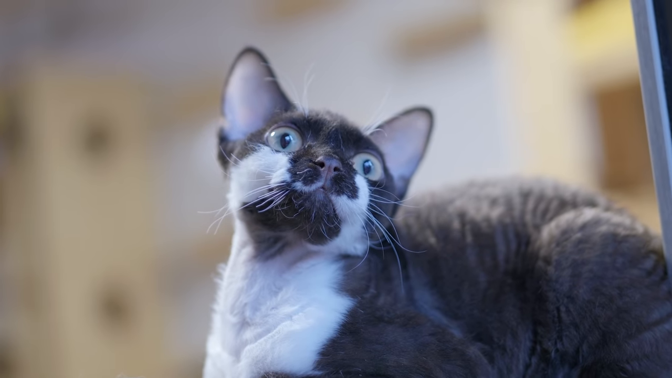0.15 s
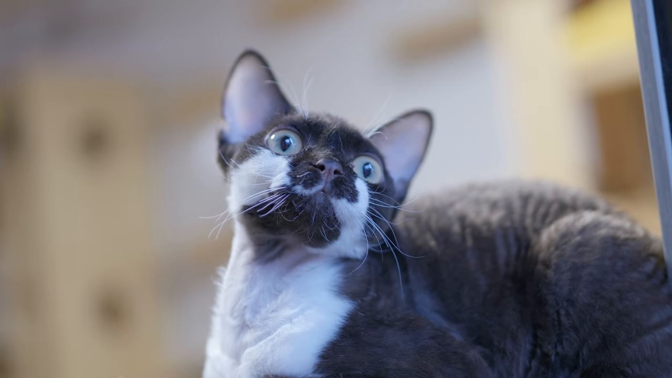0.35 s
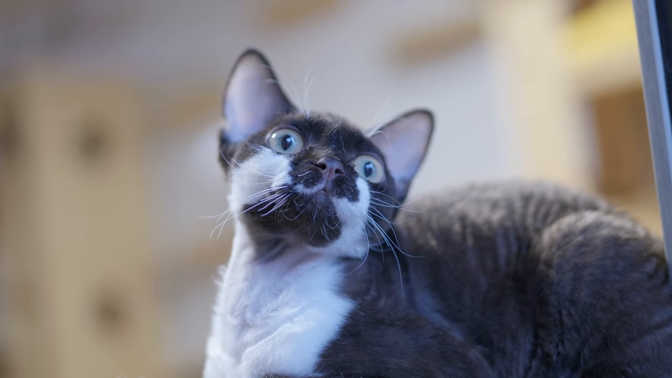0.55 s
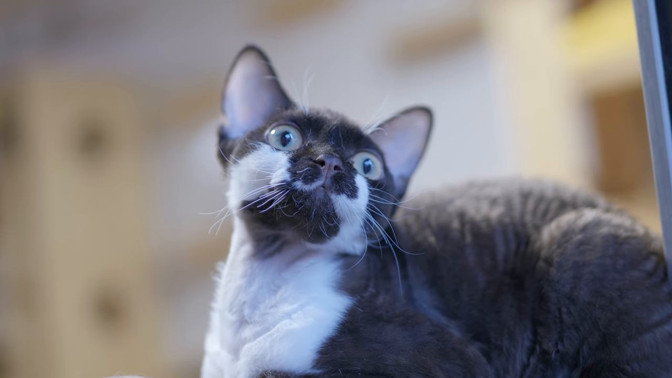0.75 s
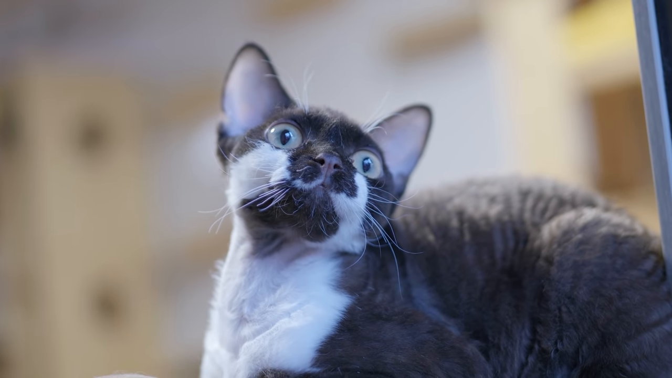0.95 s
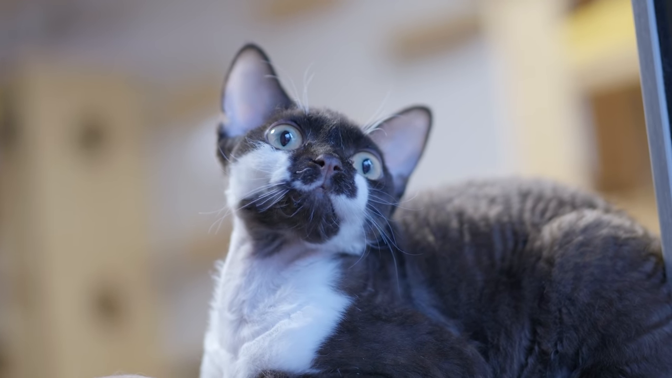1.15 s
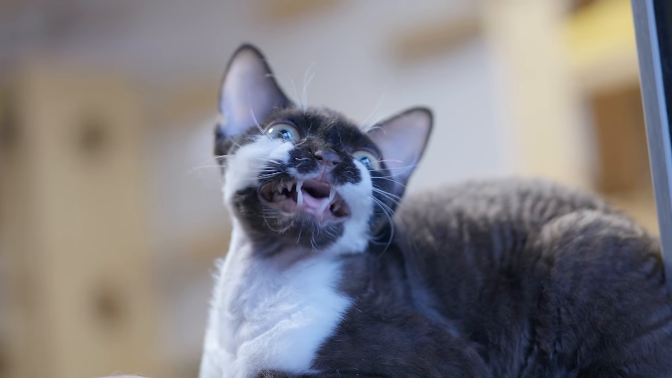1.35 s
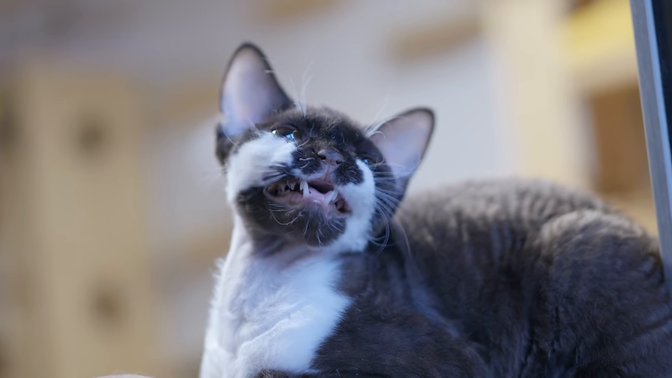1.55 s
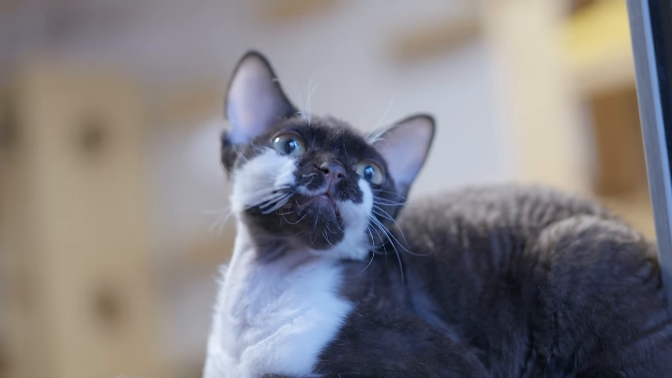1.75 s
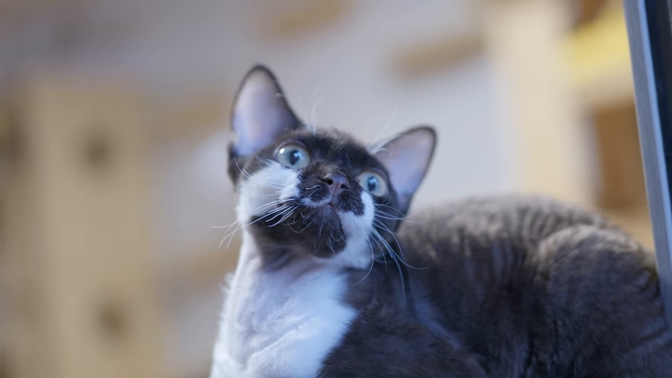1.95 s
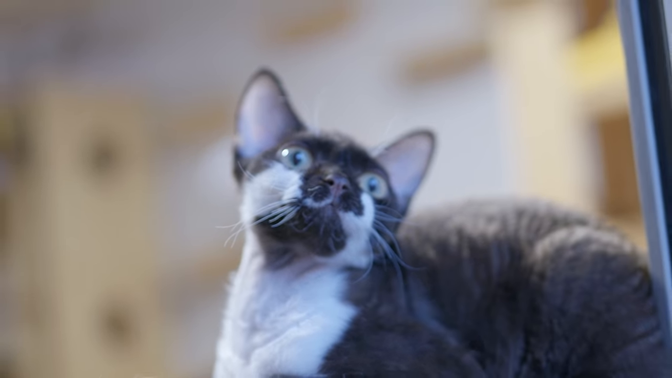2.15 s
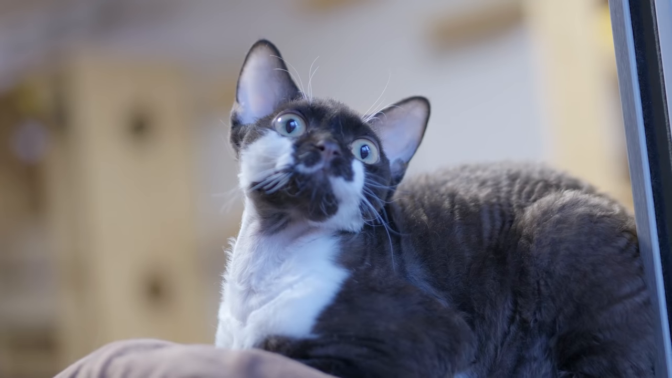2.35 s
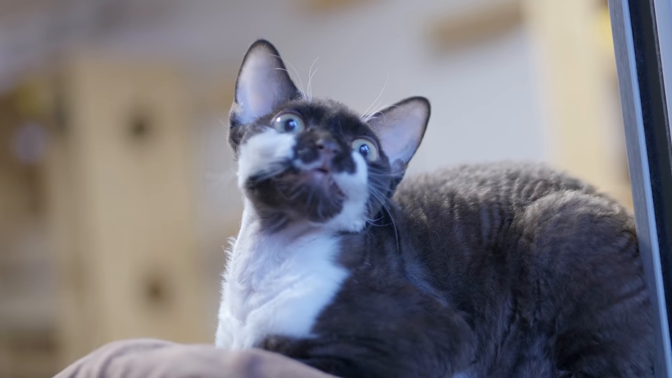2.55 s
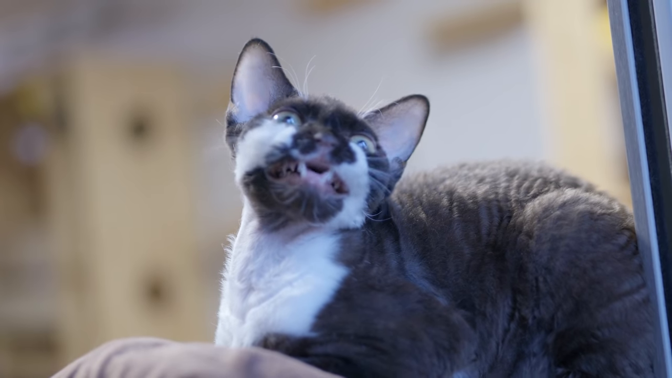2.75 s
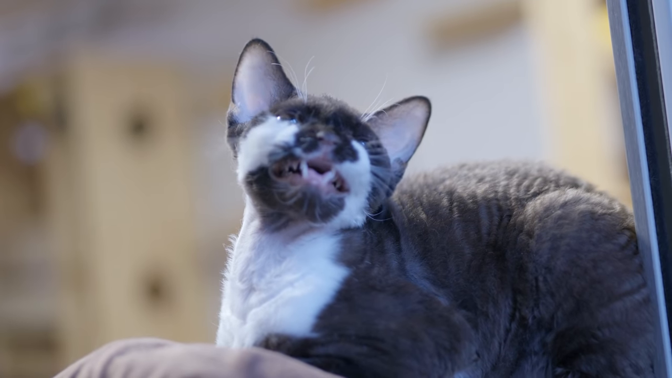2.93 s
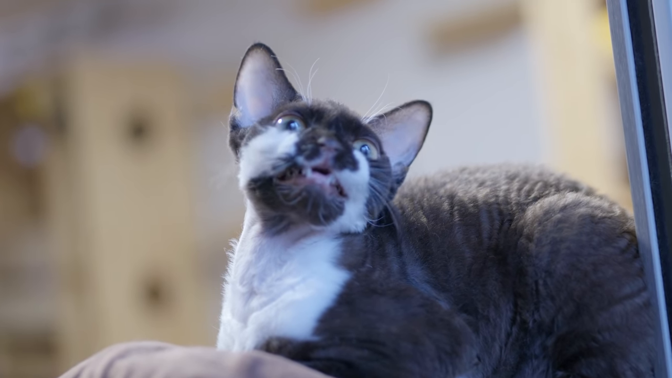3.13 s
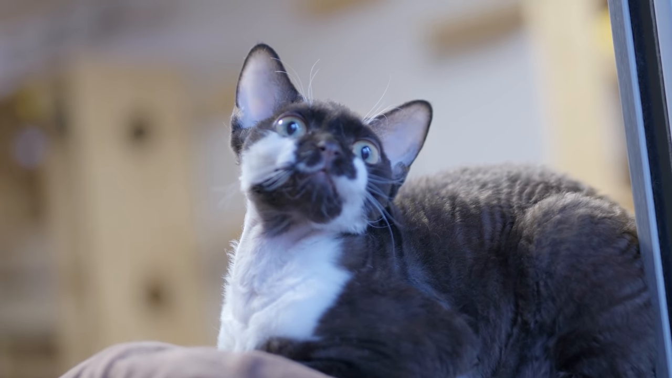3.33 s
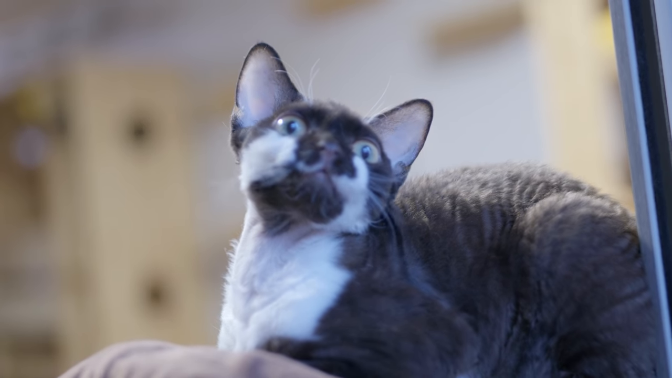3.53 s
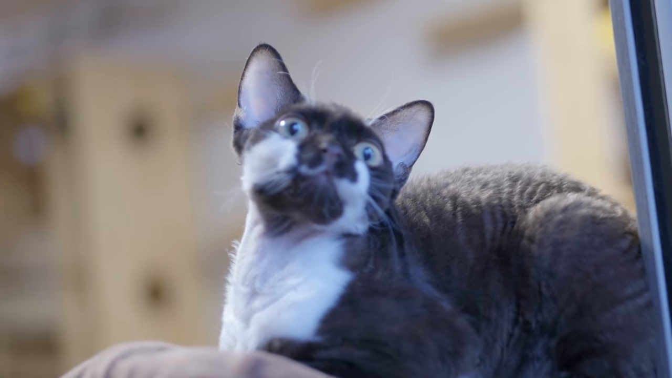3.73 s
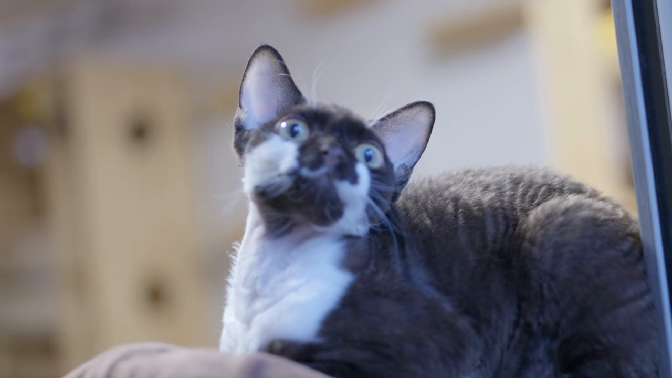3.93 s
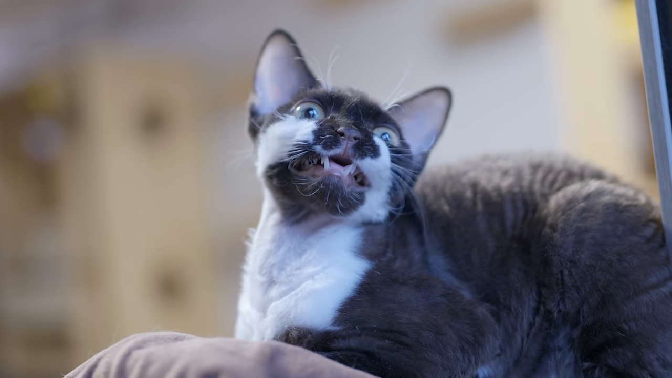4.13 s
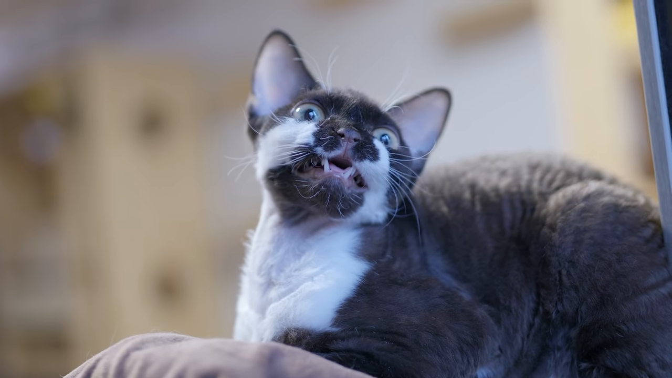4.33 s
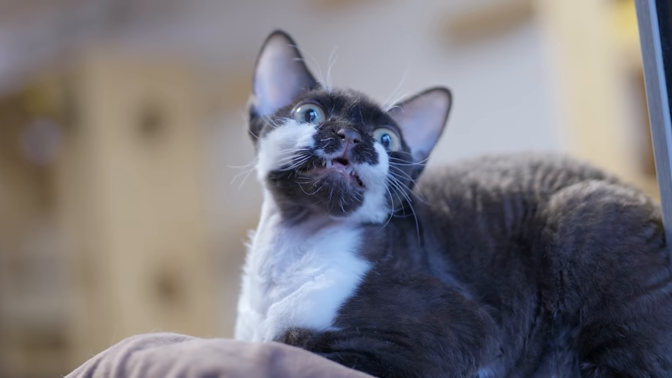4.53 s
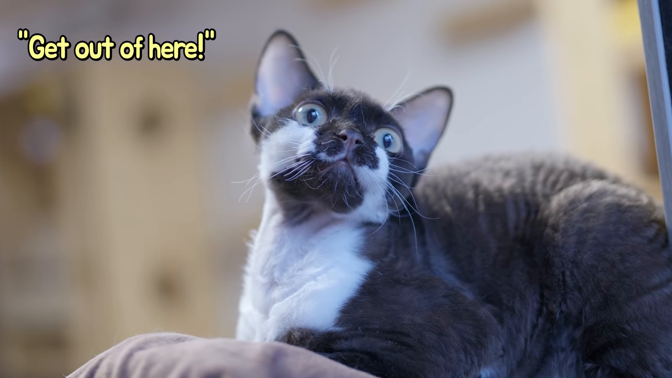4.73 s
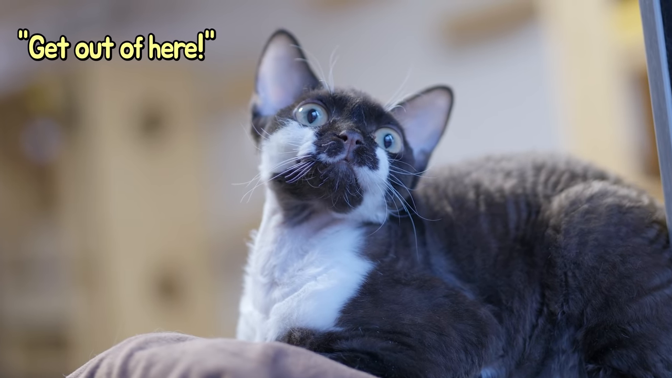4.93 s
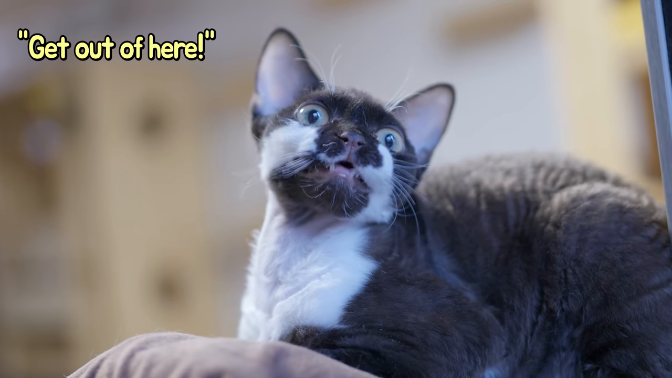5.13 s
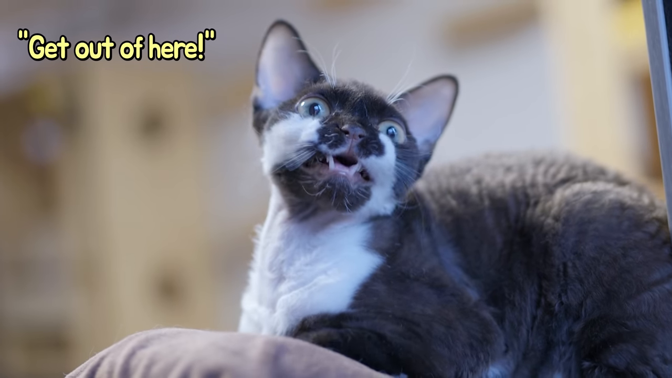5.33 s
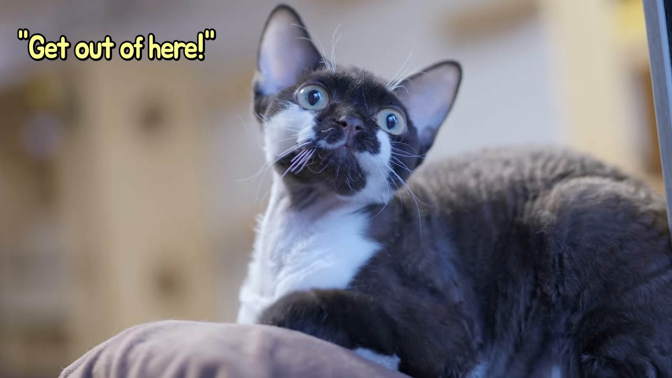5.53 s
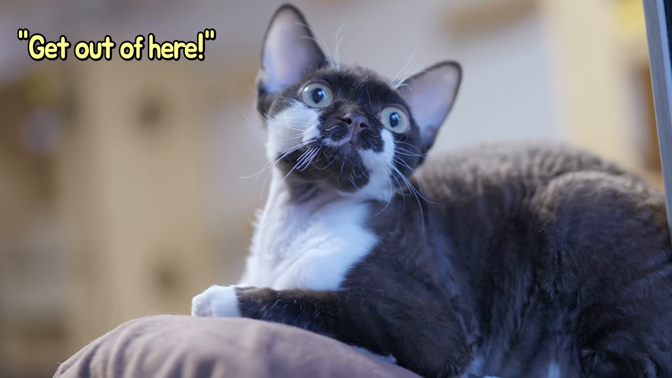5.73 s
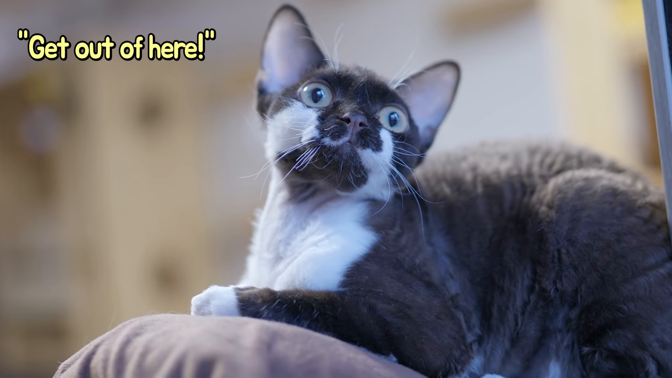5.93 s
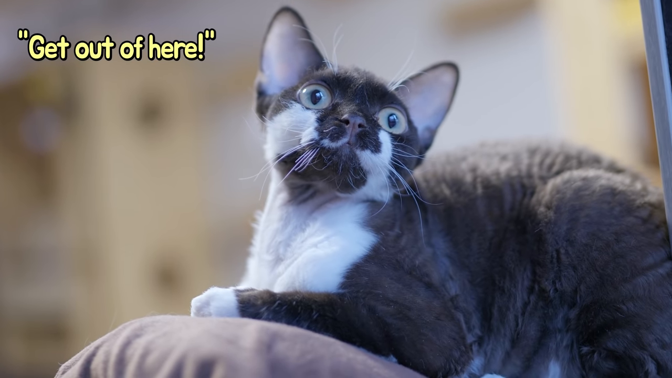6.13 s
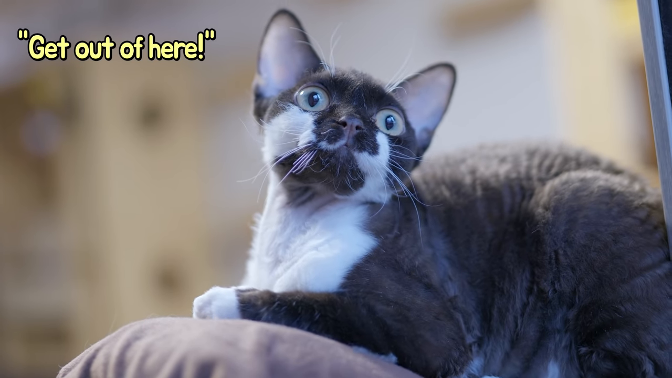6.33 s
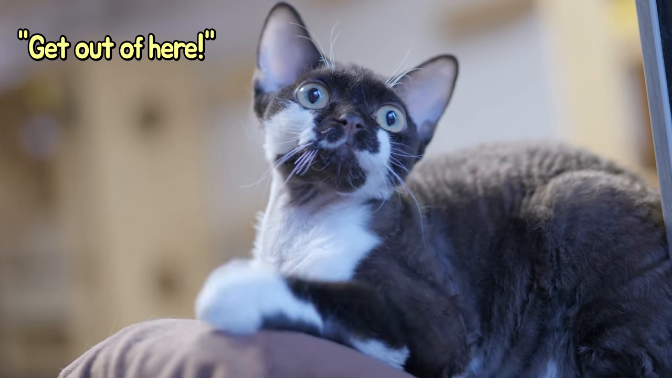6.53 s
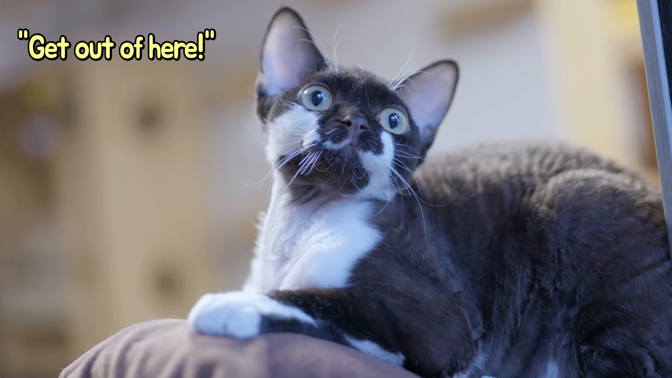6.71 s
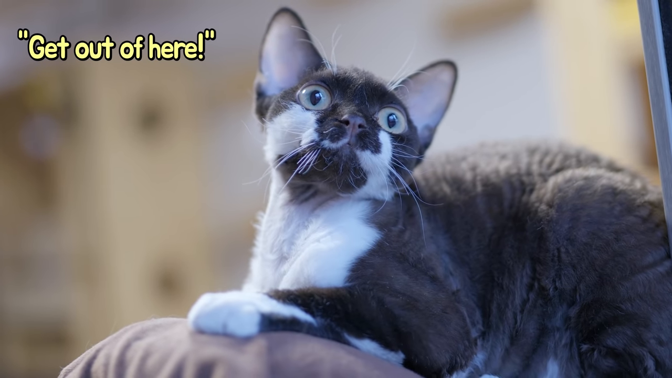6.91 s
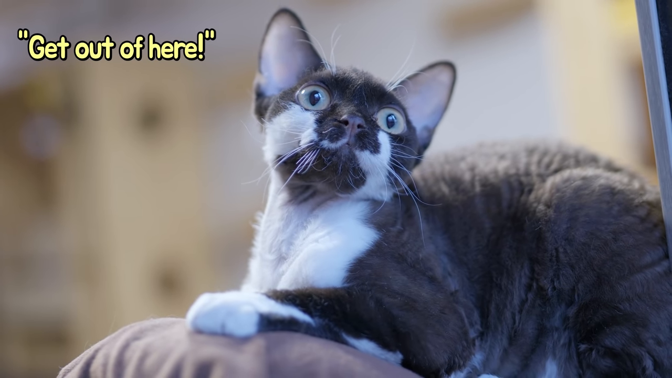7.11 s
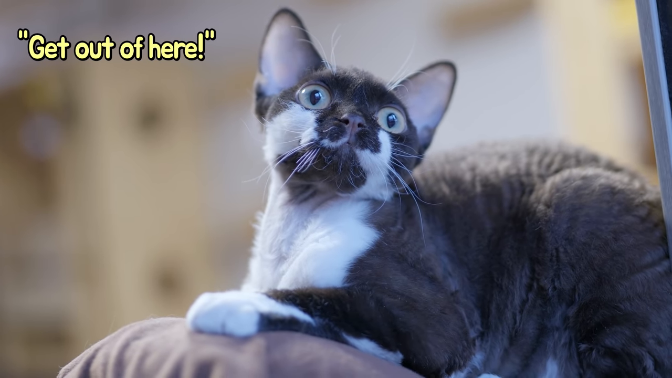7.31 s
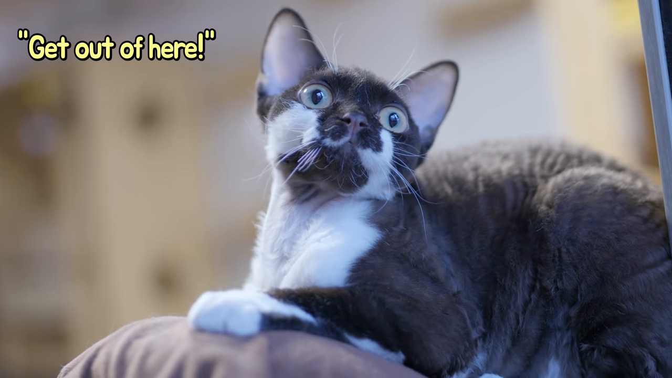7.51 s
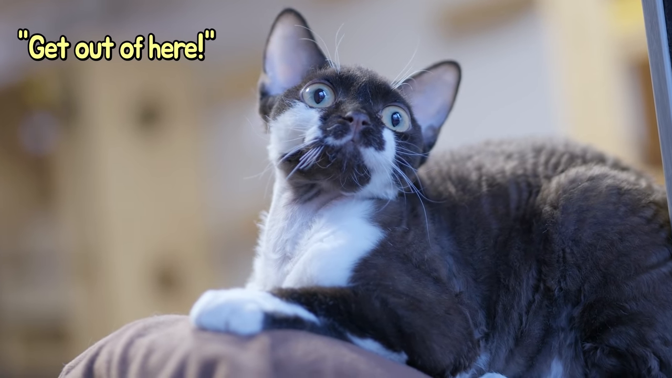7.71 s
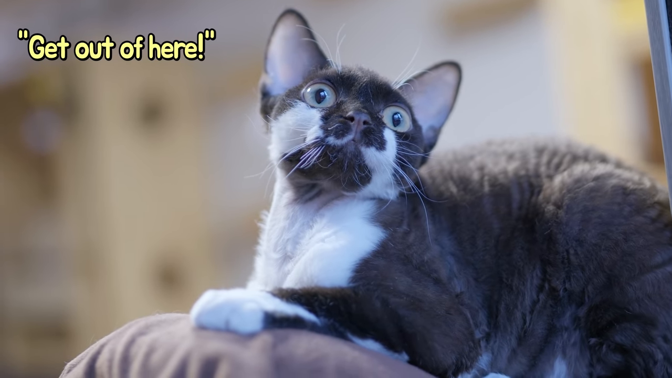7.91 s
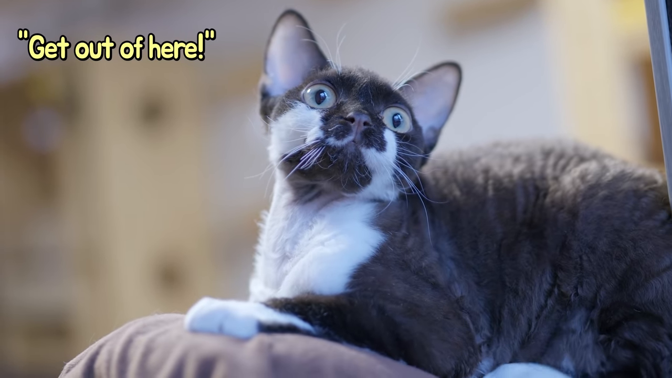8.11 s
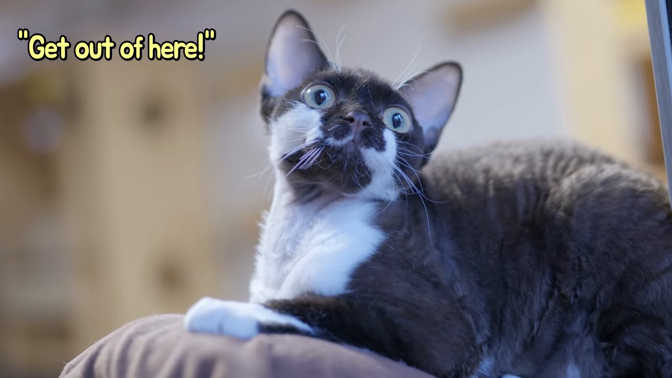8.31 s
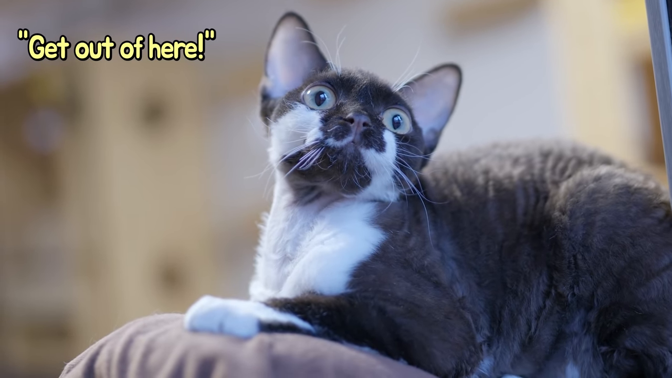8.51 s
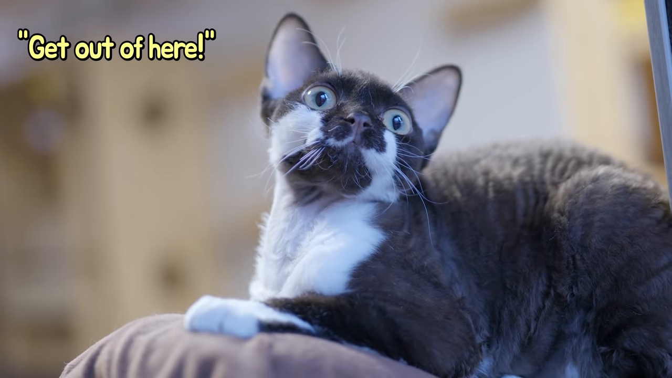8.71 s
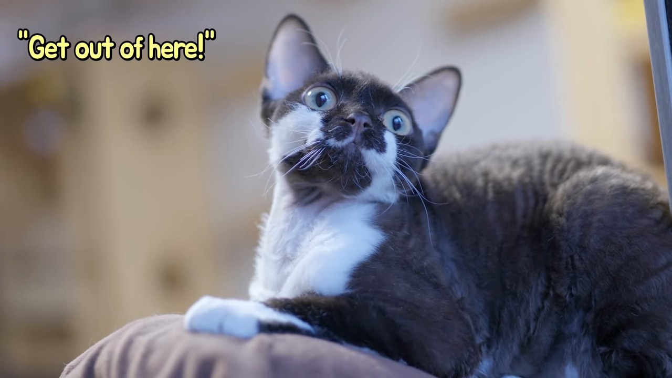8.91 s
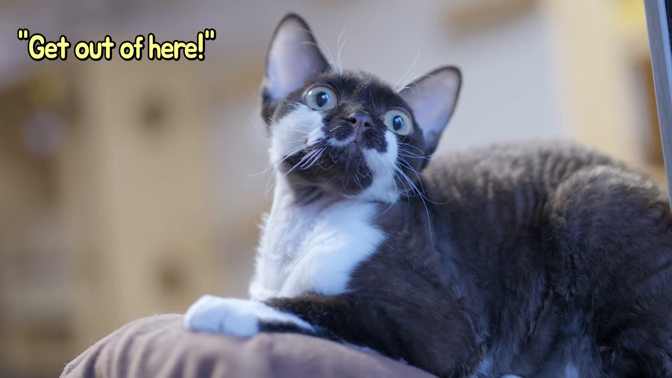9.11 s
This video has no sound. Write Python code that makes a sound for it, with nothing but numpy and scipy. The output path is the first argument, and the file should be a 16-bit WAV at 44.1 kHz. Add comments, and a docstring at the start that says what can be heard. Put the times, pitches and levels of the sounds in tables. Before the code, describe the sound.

Over a steady soft room rush, crisp wet mouth clicks come in quick irregular runs from a cat at close range, with faint throaty rustle and breathy thumps on the microphone. Between and behind the bouts, mid-pitched harsh crow calls arrive from outdoors, slightly right, with dull echoes. The clicking stops after several bouts, leaving nearer and fainter caws until the end.

```python
"""Wet snaps open the scene: a cat chatters close to a microphone indoors, over a steady low rush. Each snap is
a short pulse that rings the mouth. The same chatter figure recurs again and again: a spit and a smack, a pair
of wet clicks, a quick run of them, then a second spit with a puff of air. Each bout plays part of that figure
at its own speed and strength, and slower bouts sound lower. Crows caw outside: stacks of tones arch in pitch,
turn raspy and echo between houses."""
import sys
import numpy as np
from scipy import signal
from scipy.fft import rfft, irfft
from scipy.io import wavfile
from scipy.ndimage import uniform_filter1d, map_coordinates

SR = 44100
rng = np.random.default_rng(int(sys.argv[2]) if len(sys.argv) > 2 else 0)


def file_out(sig):
    """Save sig as 16-bit WAV at sys.argv[1]."""
    # one column per channel
    cols = np.atleast_2d(sig).T
    # limit, then scale
    lim = np.clip(cols, -1, 1)
    pcm = np.round(lim * 32767).astype(np.int16)
    wavfile.write(sys.argv[1], SR, pcm)


N = 408366
TIME = np.arange(N) / SR  # seconds


def undb(db):
    """Turn decibels into gain."""
    return 10 ** (np.asarray(db) / 20)


def unit(x):
    """Scale a sound to an average (rms) level of 1."""
    return x / np.sqrt(np.mean(x ** 2) + 1e-20)


def gain_at(hz, points):
    """Read the gain at each pitch from a curve of (Hz, dB) points, on a log-frequency axis."""
    f, db = np.transpose(points)
    return undb(np.interp(np.log(hz + 1e-3), np.log(f), db))


def noise(points, size=N):
    """Make noise with the given spectrum, rms 1."""
    spectrum = rfft(rng.standard_normal(size))
    colour = gain_at(np.fft.rfftfreq(size, 1 / SR), points)
    return unit(irfft(spectrum * colour, size))


def walk(rate, size=N):
    """Wander smoothly and by chance, about rate turns a second, with a spread near 1."""
    steps = np.arange(size) / SR * rate
    knots = rng.standard_normal(int(steps[-1]) + 3)
    return map_coordinates(knots, [steps], order=2, mode="nearest")


def add(track, s, sound):
    """Mix a sound into a track from time s (seconds) on."""
    start = int(round(s * SR))
    a, b = max(start, 0), min(start + sound.shape[-1], N)
    if b > a:
        track[..., a:b] += sound[..., a - start:b - start]


def ring(gain):
    """Turn a gain curve into the ringing that follows a sudden pulse, with nothing before it."""
    cepstrum = irfft(np.log(gain))
    half = len(cepstrum) // 2
    # folding the cepstrum forward puts all the ringing after the pulse
    cepstrum[1:half] *= 2
    cepstrum[half + 1:] = 0
    return irfft(np.exp(rfft(cepstrum)))


def burst(points, length):
    """Swell and fade a short stretch of noise over length seconds, rms 1 at its height."""
    n = int(length * SR)
    steady = unit(noise(points, size=n + 8192)[:n])
    return steady * np.sqrt(np.hanning(n))


def hump(hz):
    """Give the spectrum of one narrow resonance around hz."""
    return [(hz / 4, -50), (hz * 0.61, -20), (hz * .92, 0), (hz * 1.08, 0), (hz * 1.4, -20), (hz * 4, -55)]


def room(side_db=-17, room_db=-48.5):
    """A steady low rush with a faint wavering hum and ticking; only the outdoor part of it is wide."""
    # The rush of the room at rest. Each row: frequency in Hz, relative level in dB per Hz.
    room_spectrum = [(30, -57), (60, -27), (100, -11), (165, 4), (215, -1), (320, 3), (470, -4.5),
                     (690, -1), (880, -13.5), (1100, -9), (2500, -24.5), (6000, -31.5), (10000, -36),
                     (13000, -39), (15500, -44.5)]
    # The steady hums. Each row: frequency in Hz, level in dB before the wavering.
    hum_tones = [(165, -61), (694, -60.5)]
    outdoors = [(100, -34.5), (300, -11), (700, 3), (1400, 0.5), (2500, -11.5), (7000, -25), (15000, -26.5)]
    side = undb(side_db) * noise(outdoors)
    hum = 0
    for hz, db in hum_tones:
        wavering = 1 + 0.272 * walk(5.8)
        tone = np.sin(2 * np.pi * hz * TIME + walk(4))
        hum = hum + undb(db) * unit(wavering * tone)
    # a faint, even ticking in the treble: each tick starts at once and dies away
    tick_rate_hz, tick_hz, tick_decay_s = 29.97, 9500, .004
    tick_shape = np.exp(-(TIME % (1 / tick_rate_hz)) / tick_decay_s)
    ticks = undb(-65) * noise(hump(tick_hz)) * tick_shape
    rush = noise(room_spectrum) + np.array([side, -side])
    return rush * undb(room_db) + hum + ticks


def caw(length, top_hz, rasp_db, uneven, hiss=.09, rasp_skew=1.28, rasp_sharp=1.8):
    """One call: a harmonic stack arches through the throat's resonances, harshest just after its height."""
    # Pitch through a caw. Each row: share of the call's length, share of its top pitch.
    arch = [(0, .79), (.14, .89), (.3, .96), (.48, 1), (.68, .97), (.85, .9), (1, .8)]
    # The crow's throat at its usual pitch. Each row: frequency in Hz, level in dB.
    usual_throat = [(400, -45), (1120, -32), (1260, -12), (1390, -2), (1470, -4), (1640, 1), (1800, -5),
                    (1950, -19), (2200, -24), (2750, -44), (3200, -37), (3600, -26.5), (4200, -35),
                    (4700, -25), (5150, -21), (5950, -29), (7000, -48), (8300, -37), (10300, -30),
                    (11400, -42), (12200, -36), (13500, -58)]
    usual_pitch_hz = 458
    n = int(length * SR)
    share = np.arange(n) / n
    bend = np.interp(share, *np.transpose(arch))
    hz = top_hz * uniform_filter1d(bend, n // 8, mode="nearest")
    # a deeper call comes from a longer throat, so all its resonances lie lower
    throat = [(f * top_hz / usual_pitch_hz, db) for f, db in usual_throat]
    # uneven cycles leave the low partials clear and smear the high ones into a rasp
    phase = 2 * np.pi * np.cumsum(hz * (1 + uneven * walk(400, size=n))) / SR
    effort = np.interp(share, [0, .08, .3, .55, .88, 1], [0, .48, .72, 1, .9, 0])
    harsh = undb(rasp_db) * np.sin(np.pi * share ** rasp_skew) ** rasp_sharp
    voice = np.zeros(n)
    for k in range(2, 31):  # multiples of the pitch
        shimmer = 1 + .22 * walk(200, size=n)
        partial = gain_at(k * hz, throat) * shimmer * np.sin(k * phase)
        voice += partial * (harsh if k > 5 else 1)
    breath = hiss * harsh * noise(throat, size=n)
    return effort * (unit(voice) + breath)


def houses(t60, span, apart=0.55):
    """Lumpy echoes from house fronts over span seconds, partly different at the two ears; energy 1."""
    t = TIME[:int(span * SR)]
    edges = np.clip(np.minimum(t, t[-1] - t) / .025, 0, 1)
    # t60 is the time in seconds that the echoes take to fall by 60 dB
    fade = undb(-60 * t / t60 + 3.7 * walk(67, size=len(t))) * edges
    mid, side = rng.standard_normal((2, len(t)))
    ears = mid + apart * np.array([side, -side])
    return unit(ears * fade) / np.sqrt(len(t))


def dulled(sound, treble_db):
    """Soften the treble of a sound; treble_db is the level from 5 kHz up."""
    hz = np.fft.rfftfreq(len(sound), 1 / SR)
    return irfft(rfft(sound) * gain_at(hz, [(1450, 0), (2000, -5), (5000, treble_db)]))[None]


def crows(pan_db=-1.8, echo_t60=0.6, echo_s=.21, wash_t60=0.76, wash_s=.42,
          echo_dull_db=-7, wash_dull_db=-22, jitter=.018, blur=.036):
    """Each caw comes from a little to the right; a dull, blurred wash of it swells ahead and echoes trail behind."""
    # The calls. Each row: start in seconds, top pitch in Hz, level in dB, rasp in dB, echo in dB,
    # wash that swells ahead of the call in dB; echo and wash are relative to the call.
    caw_list = [(.065, 442, -40.5, 3, 4, -18), (.685, 427, -35, 2, 2.5, -23), (2.254, 450, -42, 3, .5, -18),
                (3.625, 457, -26.3, -1.5, -12.5, -1), (4.432, 464, -31.5, -1, 0, -16),
                (4.934, 448, -35, -.5, 1.5, -15), (6.318, 462, -31.5, -1, .5, -14),
                (6.619, 456, -48.5, -4, -5, -3), (6.819, 451, -35, 0, 1, -14.5),
                (7.252, 458, -46, -8, -11, 3.5), (7.852, 458, -47.5, -3, -11, 2.5),
                (8.467, 463, -46.5, -2, -17, 1)]
    usual_s, usual_db, s_per_db = .183, -35, .002  # louder calls last longer
    out = np.zeros((2, N))
    ears = undb(np.array([[pan_db], [-pan_db]]) / 2)
    for s, top_hz, db, rasp_db, echo_db, ahead_db in caw_list:
        length = usual_s + s_per_db * (db - usual_db)
        call = undb(db) * caw(length, top_hz, rasp_db, jitter)
        blurred = undb(db) * caw(length, top_hz, rasp_db, blur)
        echo = signal.fftconvolve(dulled(blurred, echo_dull_db), houses(echo_t60, echo_s))
        # echoes turned backwards in time grow towards the call
        growing = houses(wash_t60, wash_s)[:, ::-1]
        wash = signal.fftconvolve(dulled(blurred, wash_dull_db), growing)
        add(out, s, ears * call)
        add(out, s, undb(echo_db) * ears * echo)
        add(out, s - wash_s, undb(ahead_db) * wash)
    return out


def jaw_clicks(clicks, scatter_db=-15, scatter_s=0.022, tail_db=-24, tail_t60=0.26):
    """Tongue and lips snap apart and ring the mouth for a cycle or two; shelves and walls scatter each snap."""
    # A click at the mouth's middle opening. Each row: frequency in Hz, level in dB.
    mouth = [(300, -25.5), (1200, -16), (1650, -9.5), (2050, -6.5), (2550, 4), (3100, 5), (3650, 2.5),
             (4300, -4), (5000, -9.5), (5850, -13), (6700, -22), (7400, -31.5), (8000, -45), (15000, -66)]
    # Nearby surfaces. Each row: typical delay in seconds, echo level in dB.
    surfaces = [(.0009, -20.5), (.0017, -32.5), (.00285, -14.5), (.0201, -27)]
    middle_hz = 3130  # the mouth's resonance at that opening
    out, hz = np.zeros(N), np.fft.rfftfreq(1024, 1 / SR)
    t = TIME[:SR // 8]
    for s, db, mouth_hz, bright_db in clicks:
        # the jaw moves the lower resonance most
        opening = (mouth_hz / middle_hz) ** np.interp(hz, [3500, 6000], [1, .2])
        brightness = gain_at(hz, [(3600, 0), (5400, bright_db)])
        snap = ring(gain_at(hz / opening, mouth) * brightness)
        envelope = np.abs(signal.hilbert(snap))
        near = unit(rng.standard_normal(len(t)) / (1 + (t / scatter_s) ** 6))
        far = unit(rng.standard_normal(len(t)) * undb(-60 * t / tail_t60))
        paths = (undb(scatter_db) * near + undb(tail_db) * far) / np.sqrt(len(t))
        paths[0] = 1  # the direct sound
        for delay, echo_db in surfaces:
            varied = delay * SR * (1 + .015 * rng.standard_normal())
            paths[int(varied)] += undb(echo_db)
        level = undb(db) / envelope.max()
        add(out, s - envelope.argmax() / SR, level * signal.fftconvolve(snap, paths))
    return out


def chatter_figure(zero, slow):
    """One pass of the figure: clicks, hissing spits, the open mouth's hollow, and puffs that buffet the microphone."""
    # Times below are seconds into the figure at slowness 1; a slower figure stretches them and their lengths.
    # It also lowers the pitch of clicks and hollows. Levels are ahead of the bout's own level.
    # Clicks. Each row: time in seconds, peak in dB, mouth resonance in Hz, brightness in dB.
    figure_clicks = [(0, -7.5, 3220, 5.5), (.0373, -12, 3400, -4), (.177, -13, 3240, -2.5),
                     (.2267, -9.5, 3110, 3.5), (.3306, -12.5, 3350, 8), (.3856, -8.3, 3130, 2.5),
                     (.4356, -7.7, 3070, 5.3), (.4889, -20.3, 3050, 7), (.5516, -7.7, 3080, 0),
                     (.6013, -6.7, 3100, 5), (.6748, -16.5, 3450, -10.5)]
    # Hiss between the teeth. Each row: start in seconds, length in seconds, level in dB.
    spit_list = [(.004, .043, -33.5), (.04, .066, -45), (.603, .04, -39), (.646, .062, -44)]
    # Colour of that hiss. Each row: frequency in Hz, level in dB.
    spit_spectrum = [(800, -40.5), (2000, -6.5), (3200, 6), (4500, -0.5), (6300, 2.5), (7500, -12),
                     (10000, -25), (15000, -41)]
    # The half-open mouth resonates after a smack.
    # Each row: start in seconds, length in seconds, level in dB, starting pitch in Hz.
    hollow_list = [(.045, .11, -49, 2580), (.17, .05, -48, 2380), (.672, .008, -36, 3380)]
    # Puffs of air on the microphone. Each row: start in seconds, length in seconds, level in dB, centre in Hz.
    puff_list = [(.034, .014, -34, 335), (.31, .06, -45, 165), (.501, .13, -33.5, 88),
                 (.58, .048, -34, 185), (.628, .07, -24, 62), (.674, .022, -40, 370)]
    sag_per_s = 1.7  # share by which the hollow's pitch sinks each second as the mouth closes
    out = jaw_clicks([(zero + s * slow, db, hz / slow, bright_db) for s, db, hz, bright_db in figure_clicks])
    for s, length, db in spit_list:
        add(out, zero + s * slow, undb(db) * burst(spit_spectrum, length * slow))
    for s, length, db, hz in hollow_list:
        hollow = burst(hump(hz / slow), length * slow)
        t = TIME[:len(hollow)]
        # reading the sound ever more slowly makes it sink
        sinking = np.interp(t - sag_per_s * t ** 2 / 2, t, hollow)
        add(out, zero + s * slow, undb(db) * sinking)
    for s, length, db, hz in puff_list:
        thud = [(hz / 4, -28), (hz * .7, -1), (hz, 0), (hz * 2, -12), (hz * 4, -24), (hz * 20, -75)]
        add(out, zero + s * slow, undb(db) * burst(thud, length * slow))
    return out


def cat(flutter_db=2, rustle_db=-50.3, throat_hz=850, lead_in_s=.17, lead_in_db=-7):
    """The chatter figure rides on a rustle and a rumble; each bout starts and stops abruptly."""
    # One-off snaps outside the figure. # Each row: time in seconds, peak in dB, mouth resonance in Hz,
    # brightness in dB.
    snap_list = [(.0034, -9.5, 3250, -1), (.0054, -12, 3180, 0), (.051, -20, 2570, 0),
                 (.114, -25.5, 2600, -15), (1.1508, -21.5, 2400, -29), (1.213, -10.5, 2400, -5),
                 (1.2555, -24, 3200, 4), (1.2592, -7.5, 3040, 4), (1.2614, -4.5, 3270, 5),
                 (1.2699, 1.5, 3370, .5), (1.2704, -8.5, 3900, 3), (4.085, -22, 3300, 0)]
    # Bouts, each voicing only the part of the figure between its start and end. Each row: start in seconds,
    # end in seconds, the figure's zero in seconds, slowness, level of the whole bout in dB,
    # throat rustle in dB, rumble in dB (both ahead of the bout's level).
    bout_list = [(-.02, .119, .3, 1, -2, -54, -52), (1.134, 1.922, 1.3101, 1.0205, 1.5, -59, -52),
                 (2.525, 3.115, 2.4054, 1, 0, -50.5, -51), (3.11, 3.352, 2.9054, 1, .5, -51, -51.5),
                 (3.499, 3.77, 3.2388, 1, -.5, -56, -46), (4.082, 4.647, 4.1054, 1, 0, -50.5, -53),
                 (4.642, 4.78, 4.639, 1, -.5, -53, -49), (5.058, 5.523, 4.7373, 1.063, 6.2, -72, -46)]
    # The rustle under every bout. Each row: frequency in Hz, level in dB.
    rustle_spectrum = [(100, -4.5), (200, 1.5), (500, 5), (850, -7.5), (1200, -8), (2400, -7), (3300, -12),
                       (4500, -15), (6000, -16.5), (8000, -30), (11000, -34), (13000, -36.5), (16000, -44)]
    out = jaw_clicks(snap_list)
    rustle = undb(rustle_db) * noise(rustle_spectrum) * undb(flutter_db * walk(35))
    rumble = noise([(15, -22), (35, -3), (55, 0), (140, -5), (400, -37), (2000, -58)])
    throat = noise(hump(throat_hz))
    for start, end, zero, slow, db, throat_db, rumble_db in bout_list:
        gate = np.clip(np.minimum(TIME - start, end - TIME) / .008, 0, 1)
        # the rustle grows from a lower level up to the figure's zero
        swell = undb(lead_in_db * np.clip((zero - TIME) / lead_in_s, 0, 1))
        bout = chatter_figure(zero, slow) + swell * rustle
        bout += undb(rumble_db) * rumble + undb(throat_db) * throat
        out += undb(db) * gate * bout
    return out


def scene():
    """The cat sits straight ahead, the crows are outside, the room rushes softly."""
    return room() + crows() + cat()


def record(dry, low_cut_hz=34, top_hz=15750):
    """The microphone drops the deepest bass; the recorder cuts the top and stops at full scale."""
    bass_cut = signal.butter(3, low_cut_hz, "high", fs=SR, output="sos")
    top_cut = signal.ellip(8, .2, 70, top_hz, fs=SR, output="sos")
    heard = signal.sosfilt(bass_cut, dry)
    return np.clip(signal.sosfilt(top_cut, heard), -1, 1)


dry = scene()
out = record(dry)
file_out(out)
```